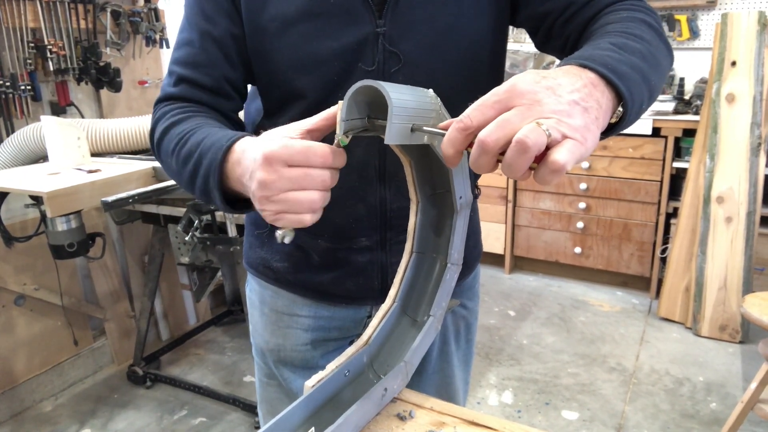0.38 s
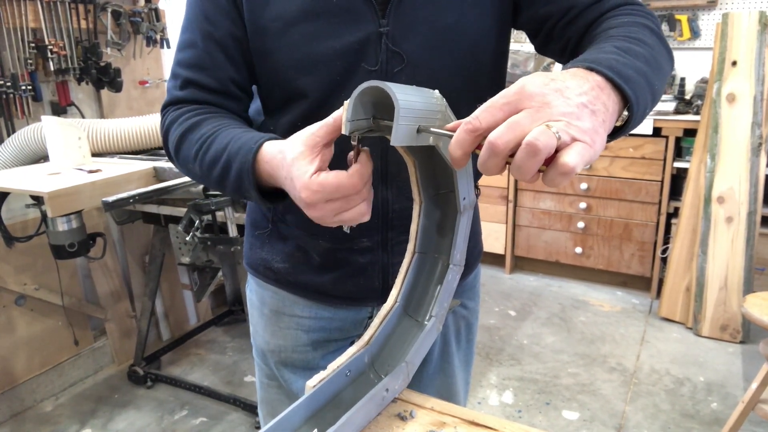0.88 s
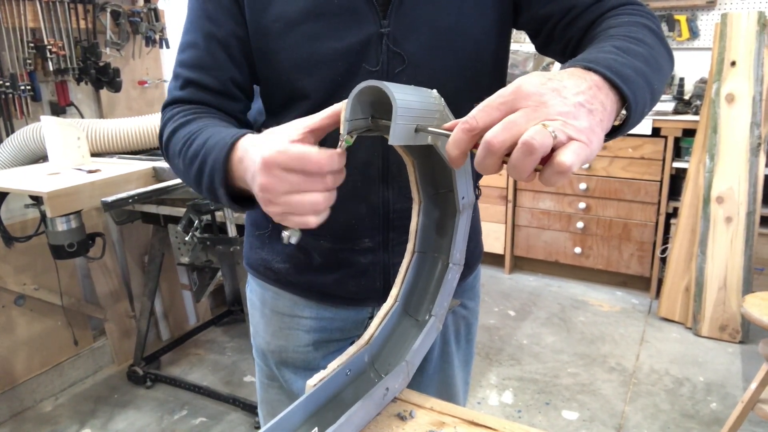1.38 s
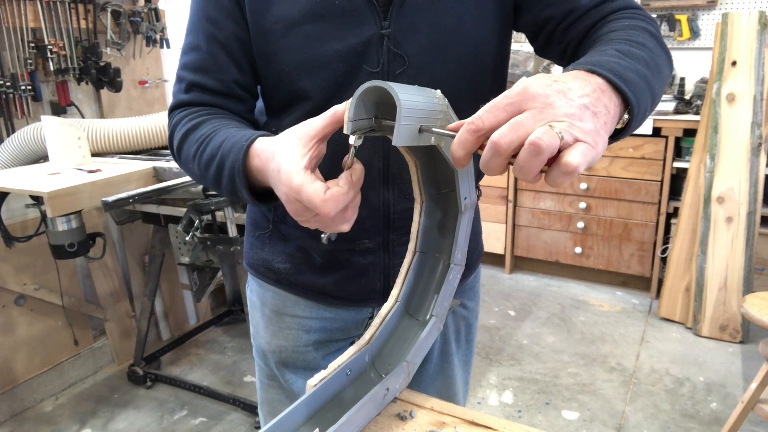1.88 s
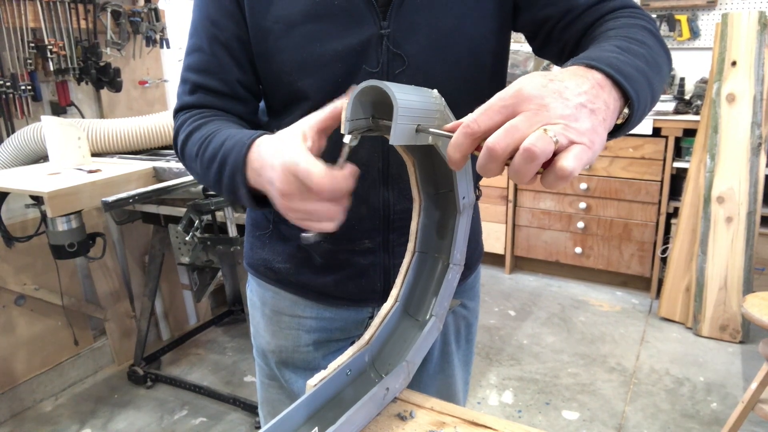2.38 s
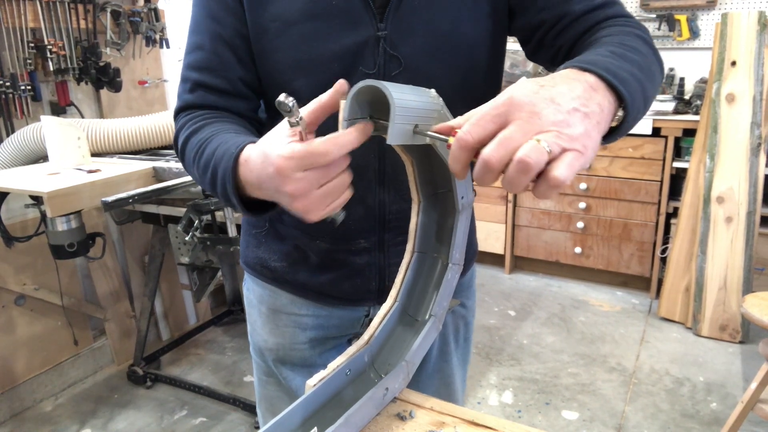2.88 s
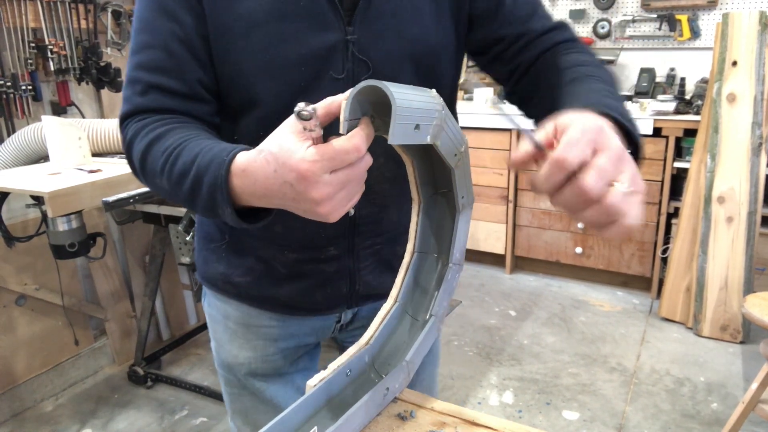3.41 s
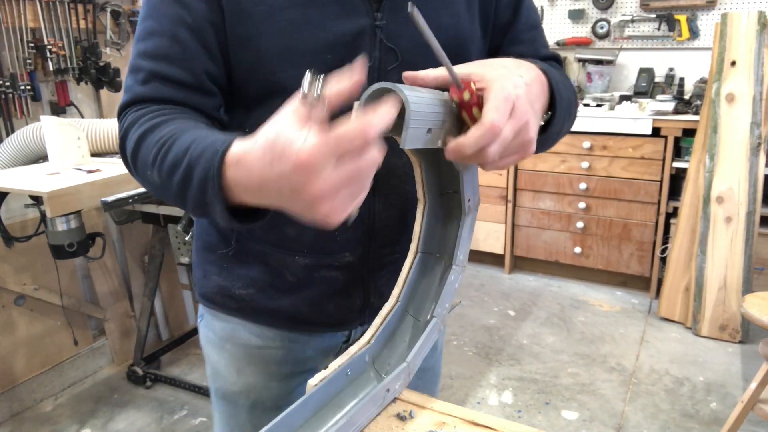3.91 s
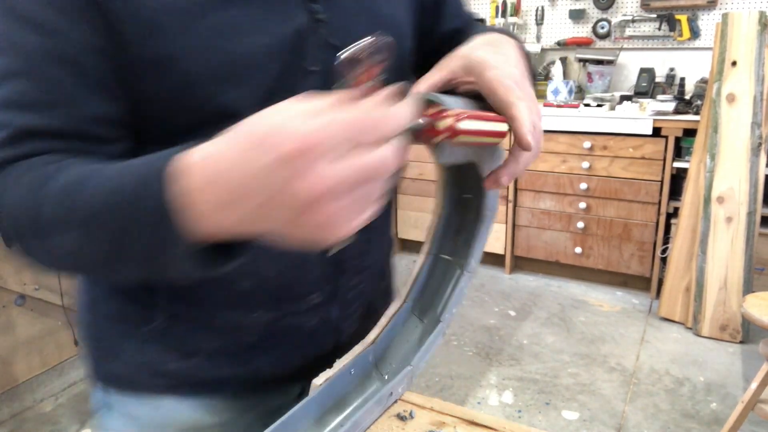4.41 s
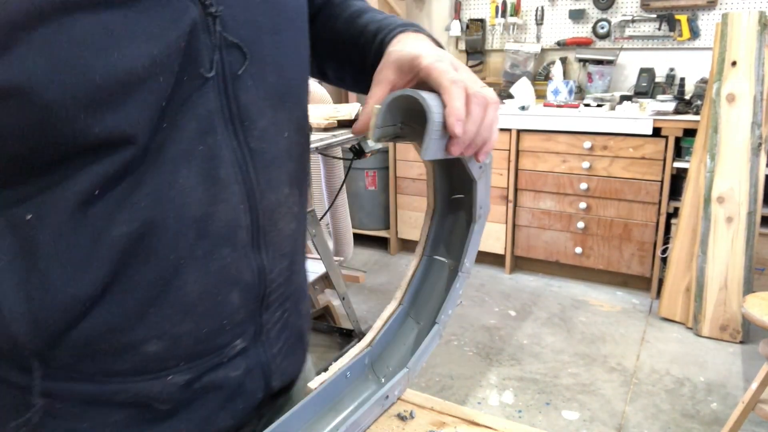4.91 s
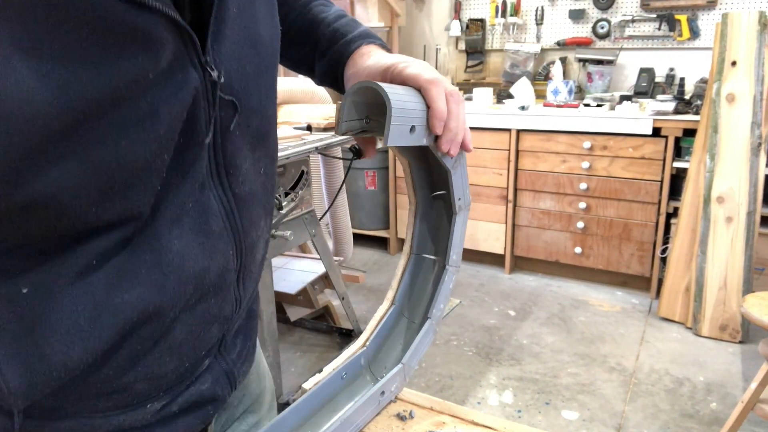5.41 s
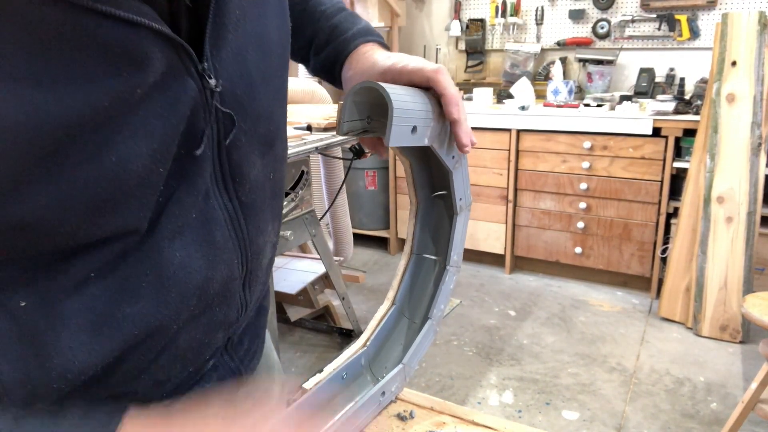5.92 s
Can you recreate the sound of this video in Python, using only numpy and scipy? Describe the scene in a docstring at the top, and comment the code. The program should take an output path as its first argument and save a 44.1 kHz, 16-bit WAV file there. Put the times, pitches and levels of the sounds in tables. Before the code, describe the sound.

In a quiet workshop with low ventilation rumble, a ratchet spanner clicks through fast back-swings, with small knocks on a hollow plastic guard. After a quieter pause, a sharp cluster of plastic knocks sounds as the tool comes away. Sleeves swish, steel tools clink together, then they land loudly on a wooden bench, bouncing and settling. Close microphone, short room echo.

```python
"""Over a low ventilation rumble and faint hiss, a ratchet spanner swings back, its pawl clicking over the teeth,
and knocks against a curved plastic guard; sleeves brush, steel tools clink, then tools drop on a wooden bench.
Each blow is a short burst of noise ringing the modes of what it hits; loose things scuff on as they settle.
Sleeves are patchy bands of noise, the air is two coloured noises, and a quiet workshop rings for half a second."""
import sys
import numpy as np
from scipy import signal
from scipy.fft import rfft, irfft
from scipy.io import wavfile
from scipy.ndimage import uniform_filter1d

SR = 44100
rng = np.random.default_rng(int(sys.argv[2]) if len(sys.argv) > 2 else 0)


def file_out(sig):
    """Save sig as 16-bit WAV at sys.argv[1]."""
    # one column per channel
    cols = np.atleast_2d(sig).T
    # limit, then scale
    lim = np.clip(cols, -1, 1)
    pcm = np.round(lim * 32767).astype(np.int16)
    wavfile.write(sys.argv[1], SR, pcm)


def nominal_scale(level):
    """Amplitude ratio for a level in decibels (scalar or array-like)."""
    x = np.asarray(level, float) / 20
    return 10 ** x


N = 266364  # samples in the scene
SIZE, LEAD = 8192, 1024  # samples: length of one blow, room ahead of the scene

# low handling and air rumble: (time [s], level [dB])
RUMBLE = [(0.1, -53), (0.6, -60.5), (1.35, -52.5), (1.6, -60), (3.28, -54.5), (3.63, -57), (4.45, -52),
          (4.91, -58), (5.6, -48.5), (6.04, -55)]
# colour of the rumble: (frequency [Hz], relative density [dB])
RUMBLE_COLOUR = [(12, -64), (20, -34), (43, -10), (119, -3), (225, -10), (264, -9), (369, -13.5),
                 (900, -23), (1170, -31), (1980, -120)]
# colour of the air hiss: (frequency [Hz], relative density [dB])
HISS_COLOUR = [(300, -21), (500, -6), (1200, -4), (1900, -8.5), (7600, -11.5), (8400, -17), (13000, -19),
               (15800, -23.5)]
HISS_DB = -66.5

# back-swings of the ratchet: (last tooth [s], level before the pull [dB])
SWINGS = [(.0625, -26.5), (.123, -28.5), (1.1387, -30.5), (2.2208, -54.5), (2.4075, -31.5)]
# teeth skipped in each back-swing: (count)
SWING_TEETH = [6, 1, 10, 1, 1]
# one tooth: dB over its level near 350 Hz and 1.3, 3.6, 7.8 and 13 kHz; chatter in ms
TOOTH_BANDS_DB, TOOTH_CHATTER_MS = (-26.5, -15.5, -5.5, -0.8, -6), 2.4
# teeth follow evenly until the hand brakes: the last gap is longest, each earlier one keeps a share of that delay
TOOTH_GAP_MS, LAST_DELAY_MS, DELAY_SHARE, TOOTH_SCATTER_DB = 10.3, 9.0, 0.45, 1.18
# the pull is strongest mid-swing: teeth before the last, width in teeth, gain in dB
PULL_AT, PULL_WIDTH, PULL_DB = 5.3, 1.3, 5.5
# what the ratchet rings with: (frequency [Hz], height of the resonance [dB], t60 [s])
RATCHET_MODES = [(310, -2, 0.16), (440, 10.5, 0.047), (1102, 10.5, 0.14), (1674, 14, 0.034),
                 (2380, 5, 0.054), (3560, -3, 0.015), (4900, 5, 0.012), (5990, 10.5, 0.0097),
                 (7530, 9.5, 0.0096), (10730, 1, 0.0058), (13000, 6, 0.017)]

# knocks on the guard: (time [s], level near 1.4 kHz [dB], treble tilt [dB/octave],
# thud near 350 Hz [dB], chatter [ms])
GUARD_KNOCKS = [(.1721, -45.5, -27, -41.5, 5.9), (.9662, -39.5, -6, -53, 4.2),
                (1.0058, -40.5, 1.5, -49, 1.6), (1.2545, -40.5, -8, -50, 11), (1.2674, -63, -5, -39.5, 6.9),
                (2.3442, -48.5, -3, -54, 6.5), (2.3587, -49, 2.3, -55.5, 3.8),
                (2.4447, -41.5, -5, -62, 4.8), (2.4631, -38.5, 6.5, -46.5, 4.9),
                (2.5932, -57, -16, -61, 4.8), (2.7592, -50.5, -5, -54.5, 5.2), (2.902, -55, -5, -68, 5.9),
                (3.144, -41.5, 5, -55, 2.3), (3.1618, -22.5, -1, -32, 4.6), (3.177, -35, -10, -46, 3.4),
                (3.2257, -34, -12, -37.5, 5), (3.2835, -38, -2, -51, 8.2), (3.2904, -28.5, 0.8, -58, 8.2),
                (3.3045, -25.5, 4.5, -42, 1.04)]
# what the guard rings with: (frequency [Hz], height of the resonance [dB], t60 [s])
GUARD_MODES = [(210, 6.5, 0.096), (327, 13.5, 0.11), (457, 3, 0.15), (612, -12, 0.054), (825, -13, 0.024),
               (1027.5, 15.5, 0.14), (1362, 12.5, 0.016), (1690, 17.5, 0.053), (2395, 10.5, 0.029),
               (3000, 7, 0.032), (4310, 13, 0.006), (6100, 6, 0.0099)]

# sleeves brushing the jacket, 20 dB down a rise before the loudest moment and a fall after it:
# (loudest moment [s], level [dB], rise [s], fall [s], hump centre at the loudest moment [Hz])
BRUSHES = [(3.53, -40.5, .2, 0.1, 3900), (3.9, -64.5, 0.43, .5, 2980), (4.47, -50.5, 0.075, 0.17, 2700),
           (4.759, -42.5, 0.16, .17, 3500)]
# colour of the cloth: (frequency [Hz], relative density [dB])
CLOTH = [(150, -45), (350, -8.5), (800, -1), (1300, 1.5), (5100, -1.5), (8000, -5.5), (10700, -13),
         (16000, -20.5)]
HUMP_SLIDE_OCT_PER_S = -1.5

# steel tools touching: (time [s], level near 3.2 kHz [dB], treble tilt [dB/octave], chatter [ms])
CLINKS = [(4.0438, -58, -4, 3.3), (4.145, -30, 2.5, 2.6), (4.245, -33.5, 7.5, 3.8), (4.252, -50, -5, 6.7),
          (4.4856, -32, -12, 2.16), (4.656, -49, -6, 5), (4.8415, -36.5, 8, 2.2), (4.8477, -43, 7.7, 1.9),
          (5.1024, -40.5, 12.5, 3.5), (5.2408, -55, 13, 8.5), (5.261, -50, 6, 2.2), (5.268, -44.5, 4, 17),
          (5.293, -52, 7, 9.2), (5.3718, -41.5, 3, 4.5), (5.470, -46, 1.5, 12), (5.5491, -40, -8.5, 3.9),
          (5.5647, -57, 14.5, 3.3)]
CLINK_THUD_DB = -28.5  # under the level of a clink
# what the steel rings with: (frequency [Hz], height of the resonance [dB], t60 [s])
STEEL_MODES = [(1150, 4.2, 0.0094), (1566, 7.7, 0.09), (2135, 1.1, 0.014), (2700, 0.71, 0.048),
               (4346, 5.8, 0.027), (5200, 4.3, 0.0086), (6760, 9.5, 0.0099), (8480, 10.2, 0.014),
               (13200, 5.5, 0.025)]

# tools landing on the bench: (time [s], level near 1.5 kHz [dB], treble tilt [dB/octave],
# thud near 350 Hz [dB], chatter [ms])
BENCH_DROPS = [(5.0962, -16, -5, -15.5, 4.7), (5.2185, -45, 2.5, -23.5, 3.7),
               (5.2869, -18.5, 0.1, -27, 6.1), (5.4375, -37, -0.5, -32, 2.7),
               (5.4614, -38.5, .3, -45.5, 5.8), (5.5635, -29.5, -9, -21.5, 8), (5.5897, -36, -13, -26, 5.6),
               (5.6253, -19.5, 8, -25.5, 7), (5.679, -15.5, 6, -22, 8)]
# what the bench rings with: (frequency [Hz], height of the resonance [dB], t60 [s])
BENCH_MODES = [(186, 2.8, 0.078), (314, 6.9, 0.053), (373.6, 8.5, 0.12), (571.6, 2.2, 0.095),
               (694.5, 7.2, 0.088), (762, 4.1, 0.049), (990, 9.3, 0.043), (1270, 10.4, 0.029),
               (1546, 1, 0.027), (1790, 8.5, 0.06), (2230, 4.9, 0.016), (3305, 2.6, 0.011),
               (4080, 12, 0.043), (5260, 0.83, 0.02), (6860, 3.3, 0.0067), (7900, 2, 0.032),
               (7800, 1.2, 0.035)]

# centres of the bands that shape a blow, with one guard band at either end: (frequency [Hz])
BAND_HZ = [110, 350, 1300, 3600, 7800, 13000, 21000]
# workshop reverberation: (frequency [Hz], relative level [dB], t60 [s])
SHOP = [(150, -7.5, 0.36), (402, -10.5, 0.5), (1180, -15, 0.53), (3600, -13, 0.48), (7000, -14.5, 0.35),
        (11400, -16.5, 0.26)]


def colour(x, points):
    """Filter by (Hz, dB) points joined on a log-frequency axis."""
    hz, db = np.transpose(points)
    f = np.fft.rfftfreq(len(x), 1 / SR) + 1
    gain_db = np.interp(np.log(f), np.log(hz), db)
    return irfft(rfft(x) * nominal_scale(gain_db), len(x))


def unit(x):
    """Scale to rms 1."""
    return x / np.sqrt(np.mean(x ** 2))


def walk(rate):
    """Random levels held 1 / rate s and slewed twice; spread a little under 0.5."""
    hold = int(SR / rate)
    steps = np.repeat(rng.standard_normal(N // hold + 1), hold)
    slewed = uniform_filter1d(uniform_filter1d(steps, hold), hold)
    return 0.6 * slewed[:N]


def curve(rows):
    """A table of (s, value) as a value per sample."""
    return np.interp(np.arange(N) / SR, *np.transpose(rows))


def band_weights(length, centres):
    """Overlapping spectral weights that peak at the given centres."""
    f = np.log(np.fft.rfftfreq(length, 1 / SR) + 1)
    return np.array([np.interp(f, np.log(centres), one) for one in np.eye(len(centres))])


def resonance(modes, size, spread, scatter_db):
    """Spectrum of a body whose every mode is a cluster of close partials with chance signs."""
    hz, db, t60 = np.transpose(modes)[:, :, None, None]
    detune, uneven = rng.standard_normal((2, len(modes), 6, 1))  # six partials a mode
    w = 2 * np.pi * hz * (1 + spread * detune)
    loss = np.log(1000) / t60
    damp = loss + 2j * np.pi * np.fft.rfftfreq(size, 1 / SR)
    sign = rng.choice([-1, 1], detune.shape)
    height = sign * nominal_scale(db + scatter_db * uneven)
    return (height * loss * w / (damp ** 2 + w ** 2)).sum(axis=(0, 1))


def strikes(blows, modes, rise_ms, lag_ms, crack_db, spread):
    """Each blow chatters a few ms, cracks and rings the modes; rows: towards the microphone, towards the walls."""
    out = np.zeros((2, N + SIZE + LEAD))
    ms = np.maximum(np.arange(SIZE) - LEAD / 2, 0) * 1000 / SR
    hz = np.fft.rfftfreq(SIZE, 1 / SR)
    # low notes spread slowly through the part and sound a little late
    late = np.exp(-2j * np.pi * hz * lag_ms / 1000 / (1 + (hz / 2500) ** 2))
    weights = band_weights(SIZE, BAND_HZ)[1:-1] * late
    blend = band_weights(SIZE, BAND_HZ[1:-1])
    fade = np.minimum(np.arange(SIZE, 0, -1) / (SIZE / 2), 1) ** 2
    for s, band_db, chatter in blows:
        # contact builds up, sags and lets go abruptly
        shape = np.minimum(ms / rise_ms, 1) * np.exp(-ms / chatter) / (1 + (ms / chatter) ** 8)
        push = rfft(rng.standard_normal(SIZE) * shape)
        push = push / uniform_filter1d(np.abs(push), size=240)
        rung = push * (nominal_scale(crack_db) + resonance(modes, SIZE, spread, scatter_db=3.0))
        # bring the loudest 4 ms of every band to its wanted level
        power = uniform_filter1d(irfft(rung * weights, SIZE) ** 2, size=SR // 250)
        peak = np.sqrt(power.max(axis=1))
        tone = nominal_scale((band_db - 20 * np.log10(peak)) @ blend) * weights.sum(axis=0)
        # summed over all directions the narrow peaks and notches even out
        smooth = np.sqrt(np.abs(uniform_filter1d(np.abs(rung) ** 2, size=130)))
        even = smooth * np.exp(1j * np.angle(rung))
        start = int(s * SR) + LEAD // 2
        out[:, start:start + SIZE] += irfft([rung * tone, even * tone], SIZE) * fade
    return out[:, :N + LEAD]


def tilted(rows, pivot_hz, bend_db):
    """Harder contact tilts a blow towards the treble; every object rounds off away from its pivot."""
    octaves = np.log2(np.array(BAND_HZ[2:-1]) / pivot_hz)
    blows = []
    for s, db, tilt, thud_db, chatter in rows:
        upper_db = db + tilt * octaves - bend_db * octaves ** 2
        blows.append((s, np.r_[thud_db, upper_db], chatter))
    return blows


def settling(rows, under_db, rise_s, t60_s):
    """After each blow the loose thing keeps shaking, in step with the thud, and comes to rest."""
    s, _, _, thud_db, _ = np.transpose(rows)[:, :, None]
    age = np.maximum(np.arange(N) / SR - s, 0)
    dying = nominal_scale(thud_db + under_db - 60 * age / t60_s)
    return (dying * (1 - np.exp(-age / rise_s))).sum(axis=0)


def scuffing(level, modes, points, grain_db):
    """Dense uneven grains of soft contact ring a body."""
    grains = rng.standard_normal(N) * nominal_scale(grain_db * walk(110)) * level
    body = 0.5 + np.abs(resonance(modes, SIZE, 0.053, scatter_db=0.5))
    body_hz = np.fft.rfftfreq(SIZE, 1 / SR) + 1
    body_points = np.transpose([body_hz, 20 * np.log10(body)])
    dull = colour(colour(grains, points), body_points)
    return np.pad(dull * np.std(grains) / np.std(dull), (LEAD, 0))


def air():
    """Unsteady low rumble under a smooth hiss."""
    rumble = unit(colour(rng.standard_normal(N), RUMBLE_COLOUR))
    rumble_level = nominal_scale(curve(RUMBLE) + 0.36 * walk(3.2))
    hiss = unit(colour(rng.standard_normal(N), HISS_COLOUR))
    hiss_level = nominal_scale(HISS_DB + 0.72 * walk(0.48))
    return rumble * rumble_level + hiss * hiss_level


def ratchet():
    """The pawl skips over teeth of one colour and length; the swing slows towards its end."""
    teeth = []
    for (last_s, db), count in zip(SWINGS, SWING_TEETH):
        before = np.arange(count)  # counted back from the last tooth
        gaps_ms = TOOTH_GAP_MS + LAST_DELAY_MS * DELAY_SHARE ** before
        times = last_s - (np.cumsum(gaps_ms) - gaps_ms) / 1000
        pull_db = PULL_DB * np.exp(-((before - PULL_AT) / PULL_WIDTH) ** 2)
        force_db = db + pull_db + TOOTH_SCATTER_DB * rng.standard_normal(count)
        for s, tooth_db in zip(times, force_db):
            teeth.append((s, tooth_db + np.array(TOOTH_BANDS_DB), TOOTH_CHATTER_MS))
    return strikes(teeth, RATCHET_MODES, rise_ms=1.23, lag_ms=2.61, crack_db=2.0, spread=0.02)


def guard():
    """Knocks ring the curved plastic guard, and a scuffing shake dies away after each."""
    knocks = strikes(tilted(GUARD_KNOCKS, 1430, bend_db=3.5), GUARD_MODES,
                     rise_ms=0.67, lag_ms=1.43, crack_db=-3.5, spread=0.0527)
    shaking = settling(GUARD_KNOCKS, under_db=-3, rise_s=0.013, t60_s=0.23)
    dullness = [(60, -10.0), (150, 15.5), (500, 11.5), (1800, -22), (3000, -36), (8000, -20.0)]  # (Hz, dB)
    return knocks + scuffing(shaking, GUARD_MODES, dullness, grain_db=3.5)


def sleeves():
    """Cloth hiss in patchy bands, with a broad hump that slides as the arm moves."""
    s, db, rise, fall, hz = np.transpose(BRUSHES)[:, :, None]
    age = np.arange(N) / SR - s
    each = nominal_scale(np.maximum(db - 20 * (age / np.where(age < 0, rise, fall)) ** 2, -200))
    level = each.sum(axis=0)
    slid_hz = hz * 2 ** (HUMP_SLIDE_OCT_PER_S * np.clip(age, -rise, fall))
    hump_hz = (each * slid_hz).sum(axis=0) / level  # the louder brush decides
    centres = 500 * 2 ** np.arange(0, 5.1, 0.5)
    cloth = colour(rng.standard_normal(N), CLOTH)
    bands = irfft(rfft(cloth) * band_weights(N, centres), N)
    hump_db = 3.4 * np.exp(-(np.log2(centres[:, None] / hump_hz) / 1.2) ** 2)
    patchy_db = 7.1 * np.array([walk(37) for _ in centres])
    hiss = unit((bands * nominal_scale(hump_db + patchy_db)).sum(axis=0))
    return np.pad(level * hiss, (LEAD, 0))


def clinks():
    """Steel tools touch: quick, bright contact with hardly any thud."""
    rows = [(s, db, tilt, db + CLINK_THUD_DB, chatter) for s, db, tilt, chatter in CLINKS]
    return strikes(tilted(rows, 3150, bend_db=4.5), STEEL_MODES,
                   rise_ms=0.24, lag_ms=0.6, crack_db=-3.0, spread=0.072)


def bench():
    """Dropped tools ring the wooden bench and scuff on it until they come to rest."""
    drops = strikes(tilted(BENCH_DROPS, 1465, bend_db=3.5), BENCH_MODES,
                    rise_ms=0.4, lag_ms=1.08, crack_db=0.2, spread=0.0547)
    shaking = settling(BENCH_DROPS, under_db=-10.5, rise_s=0.016, t60_s=0.41)
    dullness = [(50, -30), (100, -4), (200, 12.0), (1400, 3.5), (2500, -23), (8000, -33.0)]  # (Hz, dB)
    return drops + scuffing(shaking, BENCH_MODES, dullness, grain_db=4.5)


def shop(sent, build_ms=2.9):
    """Dense echoes that build up quickly and die faster in the treble."""
    hz, db, t60 = np.transpose(SHOP)
    t = np.arange(SR) / SR
    bands = irfft(rfft(rng.standard_normal(SR)) * band_weights(SR, hz), SR)
    decay = np.exp(-np.log(1000) * t / t60[:, None])
    build = 1 - np.exp(-(t * 1000 / build_ms) ** 2)
    tail = (nominal_scale(db)[:, None] * bands * decay).sum(axis=0) * build
    return signal.fftconvolve(sent, tail / np.sqrt(SR / 20))[:len(sent)]


def scene():
    """Ratchet, guard, sleeves, clinks and bench ring the shop, over its air; the ratchet is already running."""
    near, walls = ratchet() + guard() + sleeves() + clinks() + bench()
    wet = near + nominal_scale(10.0) * shop(walls)
    return (wet[LEAD:] + air())[None]


def roll_off(x):
    """The treble ends steeply here."""
    return signal.sosfilt(signal.butter(12, 16810, fs=SR, output="sos"), x)


def record(dry):
    """The microphone drops the deepest bass, below 45 Hz."""
    low_cut = signal.butter(2, 45, "high", fs=SR, output="sos")
    mix = signal.sosfilt(low_cut, dry)
    return roll_off(mix)


dry = scene()
out = record(dry)
file_out(out)
```